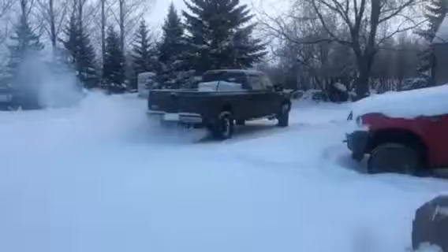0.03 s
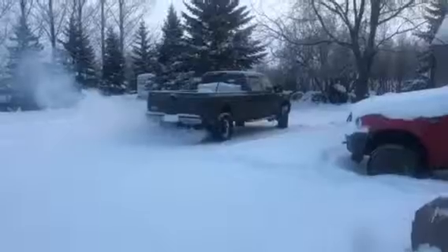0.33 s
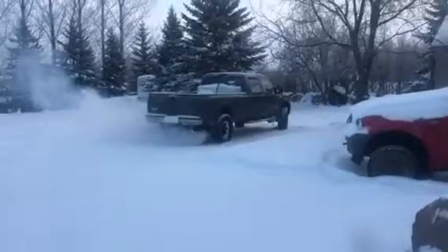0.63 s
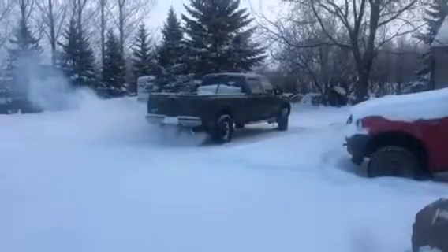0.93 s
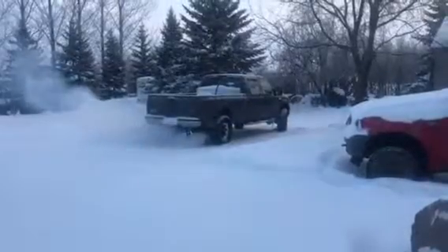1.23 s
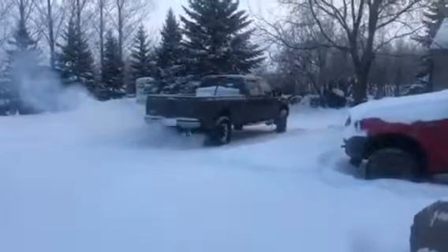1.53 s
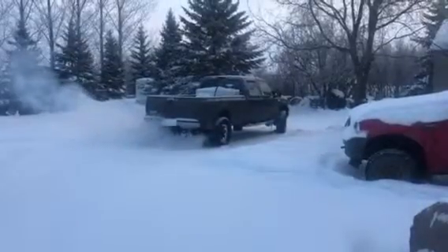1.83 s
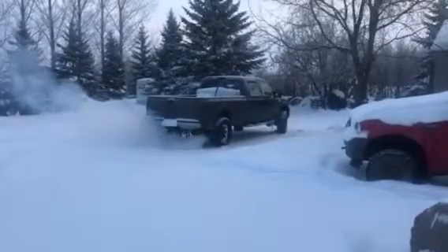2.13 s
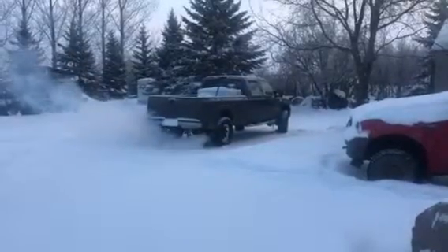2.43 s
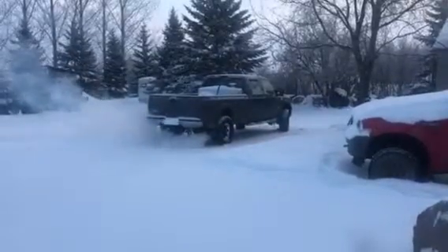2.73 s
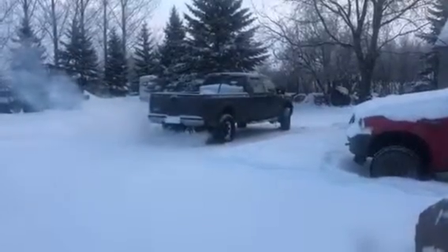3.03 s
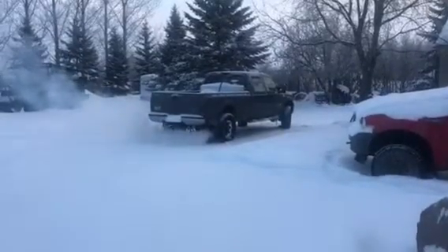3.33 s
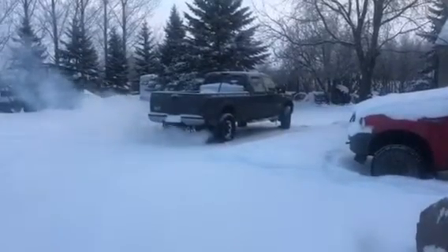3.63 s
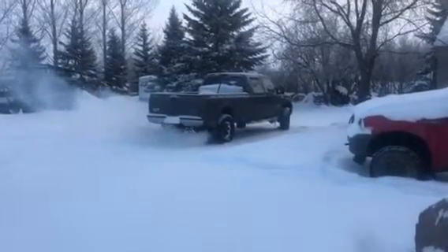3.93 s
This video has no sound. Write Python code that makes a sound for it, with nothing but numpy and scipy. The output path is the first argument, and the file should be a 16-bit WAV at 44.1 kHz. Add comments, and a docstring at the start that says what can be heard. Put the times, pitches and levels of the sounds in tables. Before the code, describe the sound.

A diesel pickup truck idles roughly in a snowy yard. Its exhaust throbs low under a hard metallic clatter and a bright rattle, pulsing about seven times a second. The speed stays steady throughout, with no echo.

```python
"""Rough diesel idle

A V8 diesel pickup idles in a snowy yard, with no echo to speak of. Its cylinders fire unevenly, so
the exhaust throbs and the clatter gaps seven times a second. Each firing puffs into the tailpipe,
knocks and slaps the ringing block and panels, thuds in the casing and sets off a bright rattle."""
import sys
import numpy as np
from scipy import signal
from scipy.fft import rfft, irfft
from scipy.io import wavfile

SR = 44100
rng = np.random.default_rng(int(sys.argv[2]) if len(sys.argv) > 2 else 0)


def output_pcm(signal):
    """Save a mono or channel-first signal as 16-bit PCM at the path in sys.argv[1].

    Samples are clipped to [-1, 1] before scaling.
    """
    pcm = np.clip(np.atleast_2d(signal).T, -1, 1) * 32767
    wavfile.write(sys.argv[1], SR, np.round(pcm).astype(np.int16))


N = 176400
TIME = np.arange(N) / SR

# idle speed (time [s], crank speed [rpm])
IDLE_SPEED = [(0, 860.8), (1.0, 859.5), (2.3, 859.2), (3.0, 857), (3.45, 854.3), (3.7, 859.8)]
# each cylinder's accent and feel, in firing order; the last barely clatters
# (puff [dB], puff lag [ms], knock [dB], clatter lag [ms], thud [dB], rattle [dB])
CYLINDER_ACCENTS = [(-1.2, -0.37, -3, -.4, 3.5, -2), (1.4, -0.25, -0.5, -.1, 0.5, 0),
                    (2, 0.67, 2, .5, -0.5, 2), (2.27, 0.62, -1, .6, 0.5, 1.6), (-5, 1, 2.5, .2, 0, 2.2),
                    (-5.5, -0.93, -0.4, -.4, 2, 1.7), (2, -0.94, 2, .1, -1.5, 3),
                    (-3, -0.42, -22.5, .2, -6.5, -35)]
# boom of the pipe and muffler (pitch [Hz], width [Hz], gain [dB])
PIPE_MODES = [(73.2, 9.32, 35), (69.68, 17.36, 32), (60.1, 7.9, 16.5), (108, 8.16, 26), (147.5, 11.1, 20),
              (123.4, 7.2, 24), (216.95, 21.85, 25), (221.47, 20.9, 22.5), (244.3, 7, 18),
              (368.6, 7.8, -4.5)]
# short, hard ring of the engine block (pitch [Hz], width [Hz], relative level [dB])
BLOCK_MODES = [(1081, 284, -5.5), (1296, 225, -2), (1491, 180, 0), (1947, 315, 4), (2277, 160, -2),
               (2564, 144, 1), (2960, 164, -4), (3157, 178, -1.5), (3372, 63, -5.5), (4330, 60, -12),
               (4434, 94, -6.5), (4760, 80, -25.5), (5200, 110, -19.5), (5610, 310, -7), (5980, 260, -13)]
# longer ring of the panels (pitch [Hz], width [Hz], relative level [dB])
PANEL_MODES = [(1102, 20, -2), (1548, 27, -5), (1873, 29, -1), (2166, 19, -3.5), (2550, 26, -0.5),
               (2645, 32, 1), (2840, 42, -3), (3286, 41, -1), (3665, 48, 3), (4540, 68, -3.5),
               (5730, 64, -10)]
# hollow body of the casing (pitch [Hz], width [Hz], relative level [dB])
CASING_MODES = [(338, 123, -7), (534, 28, -3), (613, 62, 7), (690, 93, -2.5)]
# colour of the bright rattle (frequency [Hz], relative level [dB])
RATTLE_SPECTRUM = [(1500, -13.5), (4000, -4.5), (5100, -13.5), (6000, -5), (6500, -4), (6900, 3),
                   (7400, -1), (7850, -2), (8100, 1), (9600, 0.5), (10500, -3.5), (11050, 0), (12000, -2),
                   (14000, -1.5), (15800, -8.5)]
# colour of the steady engine rush (frequency [Hz], relative level [dB])
RUSH_SPECTRUM = [(25, -15), (60, -2), (200, -0.5), (300, 2.5), (450, -1.5), (780, -10.5), (1200, 4),
                 (3000, -5), (6000, -28), (15000, -21)]

BLOCK_DB, PANELS_DB, RATTLE_DB, RUSH_DB, THUD_DB = -34, -42.5, -47, -48, -51.5  # rms in the mix
PIPE_DELAY_MS, PUFF_JITTER_MS, PUFF_SPREAD_DB = 7.56, .12, 1
BLOW_JITTER_MS, BLOW_SPREAD_DB = .4, .6
KNOCK_LEAD_MS, THUD_LEAD_MS, RATTLE_LAG_MS = 1.3, 2.56, .31
SLAP_AFTER_MS, SLAP_DB = 9.3, -4.5  # relative to the knock
CYCLE_START_S = 2.0455  # the first cylinder fires here
START_S, BASS_FULL_S, BASS_START_DB, BASS_EDGE_HZ, CUTOFF_HZ = .12, .33, -9.5, 250, 15900


def exhaust(times, cylinder):
    """The throb: one puff per firing booms in the pipe and muffler."""
    puff_db, lag_ms = np.array(CYLINDER_ACCENTS)[cylinder].T[:2]
    jitter, spread = rng.standard_normal((len(times), 2)).T
    at = times + (PIPE_DELAY_MS + lag_ms + PUFF_JITTER_MS * jitter) / 1000
    puffs = place(at, puff_db + PUFF_SPREAD_DB * spread, np.ones((len(at), 1)))
    return cut(resonate(puffs, PIPE_MODES), 35, "high", order=3)


def clatter(times, cylinder):
    """Each firing hits the metalwork, never with quite the same force or timing."""
    knock_db, lag_ms, thud_db, rattle_db = np.array(CYLINDER_ACCENTS)[cylinder].T[2:]
    spread, jitter = rng.standard_normal((len(times), 2)).T
    force_db = BLOW_SPREAD_DB * spread
    due = times + lag_ms / 1000
    at = due + BLOW_JITTER_MS * jitter / 1000
    hits = knock_and_slap(at - KNOCK_LEAD_MS / 1000, cylinder, knock_db + force_db)
    thud = casing_thud(due - THUD_LEAD_MS / 1000, cylinder, thud_db + force_db)
    rattle = bright_rattle(at + RATTLE_LAG_MS / 1000, rattle_db + force_db)
    return block_ring(hits) + panel_ring(hits) + rattle + thud


def knock_and_slap(times, cylinder, dbs):
    """A sharp combustion knock, then a lighter piston slap with a longer tail."""
    knock = blows(times, cylinder, dbs, envelope(rise_ms=2.64, fall_ms=7.8), alike=.37, grain_db=.8)
    slap = blows(times + SLAP_AFTER_MS / 1000, cylinder, dbs + SLAP_DB,
                 envelope(rise_ms=1.7, fall_ms=16.3), alike=.4, grain_db=.9)
    return knock + slap


def block_ring(hits):
    """The block rings briefly under each hit: the hard edge of the clatter."""
    ring = cut(resonate(hits, BLOCK_MODES, alternate=False), 984, "high", order=6)
    return at_level(cut(ring, 5460, "low", order=4), BLOCK_DB)


def panel_ring(hits):
    """Panels pick up the top of the hits and keep ringing after them."""
    treble = cut(hits, 1060, "high", order=4)
    return at_level(resonate(treble, PANEL_MODES, alternate=False), PANELS_DB)


def bright_rattle(times, dbs):
    """A grainy sizzle on every firing; overlapping tails add in power."""
    power = place(times, 2 * dbs, [envelope(rise_ms=4.2, fall_ms=19) ** 2] * len(times))
    return at_level(np.sqrt(power) * coloured_noise(RATTLE_SPECTRUM) * flicker(depth_db=1), RATTLE_DB)


def casing_thud(times, cylinder, dbs):
    """A clean push and a loose, gritty burst make a dull thud in the casing."""
    push = place(times, dbs, np.ones((len(times), 1)))
    loose = blows(times, cylinder, dbs, envelope(rise_ms=1.3, fall_ms=5), alike=.044, grain_db=4.5)
    thud = resonate(at_level(push, 0) + at_level(loose, 1), CASING_MODES)
    return at_level(cut(thud, 680, "low", order=4), THUD_DB)


def engine_rush():
    """A steady bed of engine noise under the beat."""
    return at_level(coloured_noise(RUSH_SPECTRUM), RUSH_DB)


def firings():
    """Time and cylinder of every firing: four to a turn of the crank."""
    rpm = np.interp(TIME, *np.transpose(IDLE_SPEED))
    count = np.cumsum(rpm) * 4 / 60 / SR
    count -= np.interp(CYCLE_START_S, TIME, count)
    beats = np.arange(np.ceil(count[0]), count[-1]).astype(int)
    return np.interp(beats, count, TIME), beats % len(CYLINDER_ACCENTS)


def blows(times, cylinder, dbs, shape, alike, grain_db):
    """Bursts of tiny contacts; `alike` is the share that a cylinder repeats every time."""
    own = rng.standard_normal((len(CYLINDER_ACCENTS), len(shape)))
    fresh = rng.standard_normal((len(times), len(shape)))
    contacts = np.sqrt(alike) * own[cylinder] + np.sqrt(1 - alike) * fresh
    return flicker(grain_db) * place(times, dbs, shape * contacts)


def envelope(rise_ms, fall_ms):
    """Quick attack, exponential tail."""
    ms = TIME[:SR // 12] * 1000
    return np.minimum(ms / rise_ms, 1) * np.exp(-np.maximum(ms - rise_ms, 0) / fall_ms)


def flicker(depth_db):
    """Grain: a gain that changes at random about every millisecond."""
    steps = np.arange(N) / 40
    return from_db(depth_db * np.interp(steps, np.arange(N), rng.standard_normal(N)))


def place(times, dbs, sounds):
    """Lay one short sound at each time."""
    out = np.zeros(N + SR)
    starts = (np.maximum(times, 0) * SR).astype(int)
    for start, db, sound in zip(starts, dbs, sounds):
        out[start:start + len(sound)] += from_db(db) * sound
    return out[:N]


def resonate(x, modes, alternate=True):
    """Parallel resonances, alternating in sign, or else with notches between them."""
    out = 0
    for k, (hz, width, db) in enumerate(modes):
        radius = np.exp(-np.pi * width / SR)
        poles = [1, -2 * radius * np.cos(2 * np.pi * hz / SR), radius ** 2]
        gain = -(-1) ** (k * alternate) * from_db(db) * (1 - radius ** 2) / 2
        out += gain * signal.lfilter([1, 0, -1], poles, x + 1e-18)
    return out


def coloured_noise(spectrum):
    """Noise with the given spectrum."""
    hz, db = np.transpose(spectrum)
    bins = np.arange(N // 2 + 1) * SR / N
    gain = from_db(np.interp(np.log(bins + 1), np.log(hz), db))
    return irfft(rfft(rng.standard_normal(N)) * gain, N)


def cut(x, hz, kind, order):
    """Butterworth high- or low-pass."""
    return signal.sosfilt(signal.butter(order, hz, kind, fs=SR, output="sos"), x)


def at_level(x, db):
    """Scale to an rms level."""
    return x * from_db(db) / np.sqrt(np.mean(x ** 2) + 1e-20)


def from_db(db):
    """Decibels to gain."""
    return 10 ** (np.asarray(db) / 20)


def scene():
    """The idling truck in mono: throb and clatter over the rush."""
    times, cylinder = firings()
    return (exhaust(times, cylinder) + clatter(times, cylinder) + engine_rush())[None]


def record(dry):
    """The sound cuts in, thin in the bass for a moment; the very top is shaved off."""
    bass = signal.sosfiltfilt(signal.butter(2, BASS_EDGE_HZ, fs=SR, output="sos"), dry)
    bass_gain = from_db(np.interp(TIME, [BASS_FULL_S - .05, BASS_FULL_S], [BASS_START_DB, 0]))
    heard = (dry + (bass_gain - 1) * bass) * (TIME > START_S)
    return signal.sosfilt(signal.ellip(12, .1, 90, CUTOFF_HZ, fs=SR, output="sos"), heard)


dry = scene()
out = record(dry)
output_pcm(out)
```